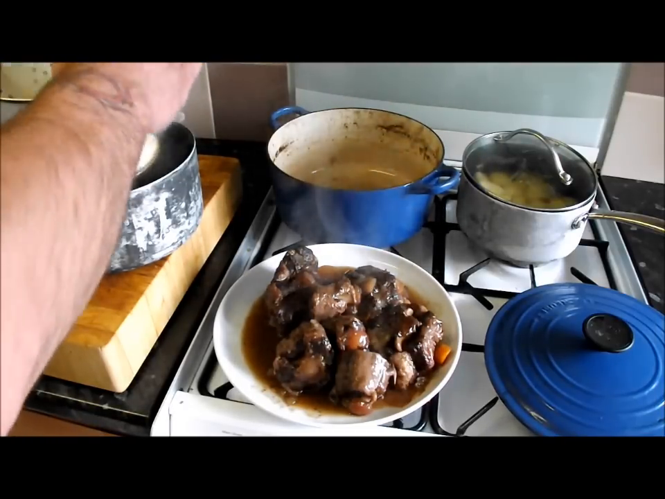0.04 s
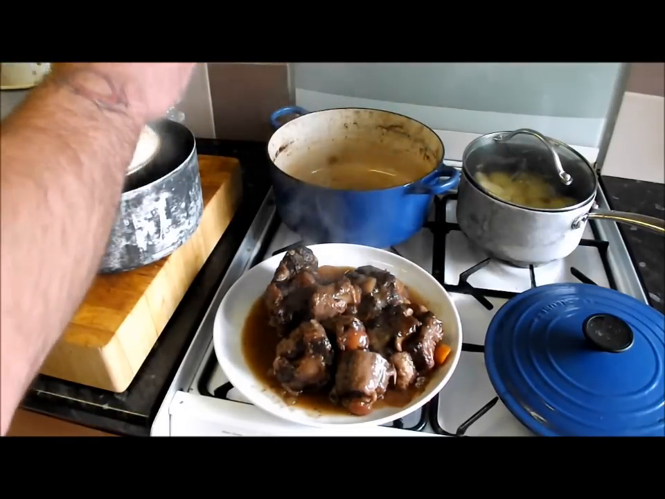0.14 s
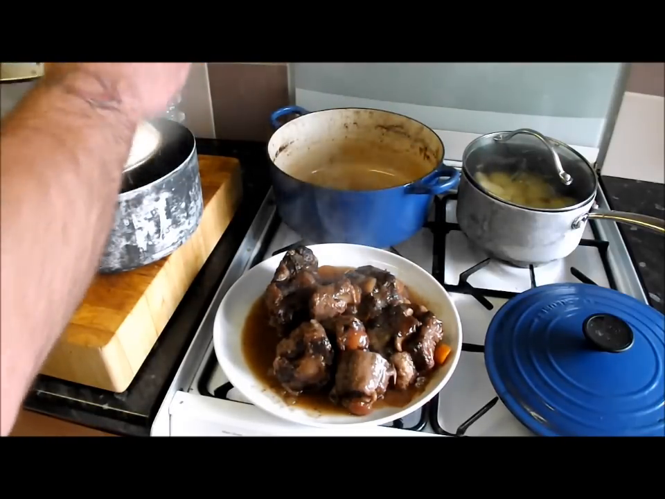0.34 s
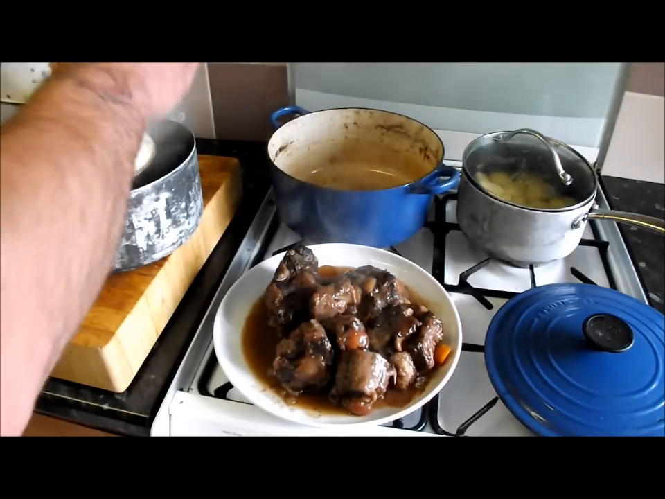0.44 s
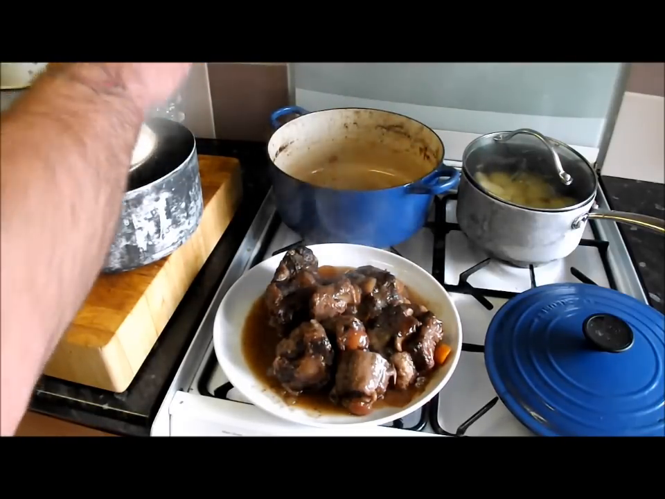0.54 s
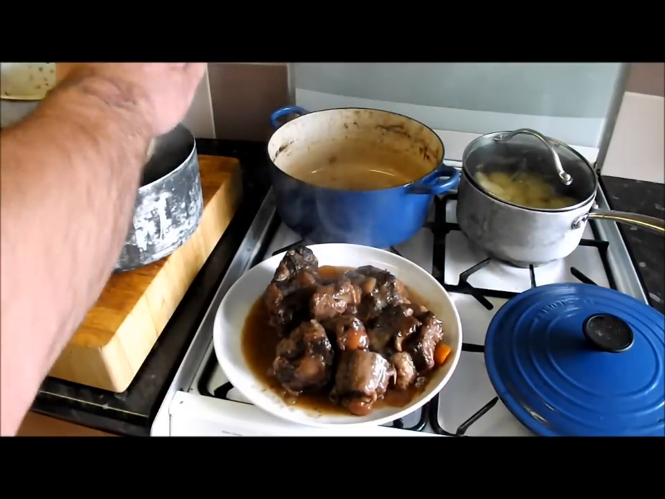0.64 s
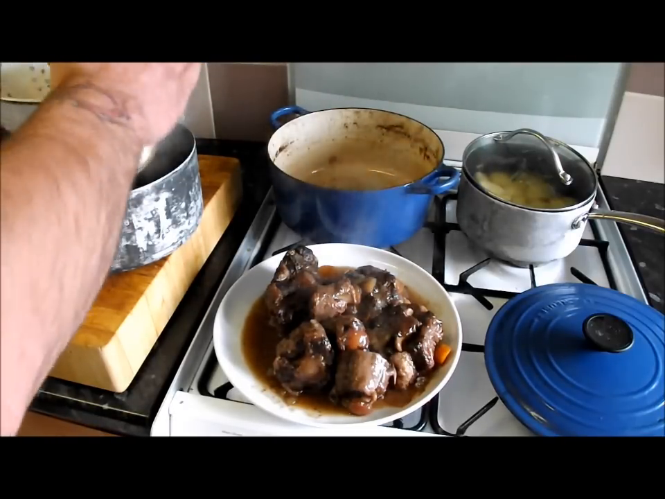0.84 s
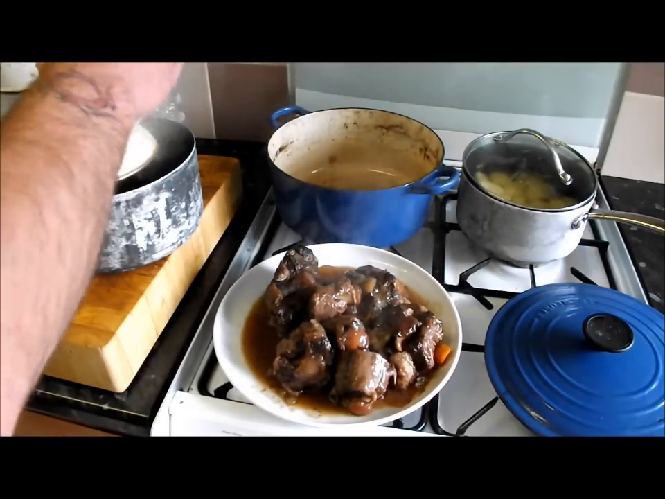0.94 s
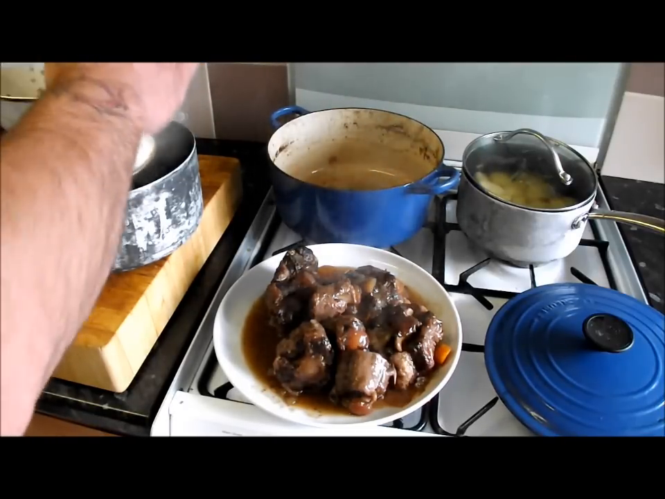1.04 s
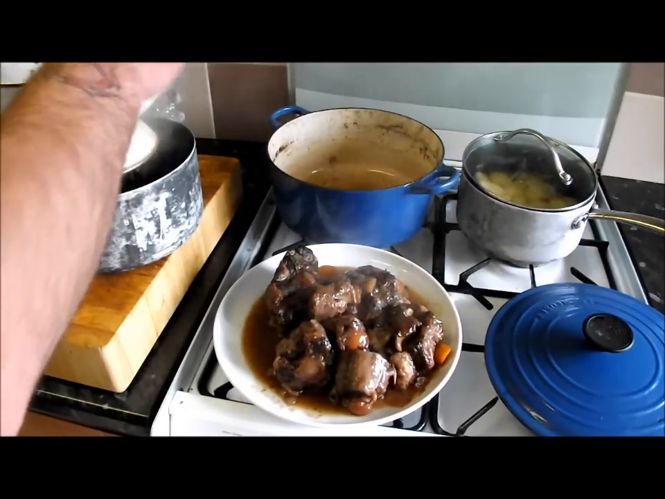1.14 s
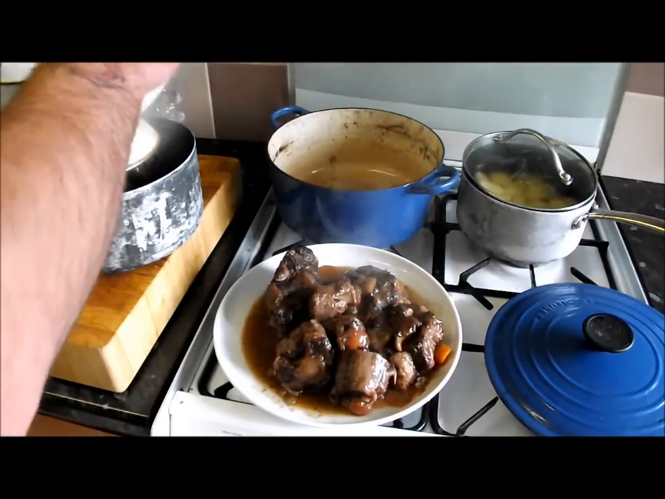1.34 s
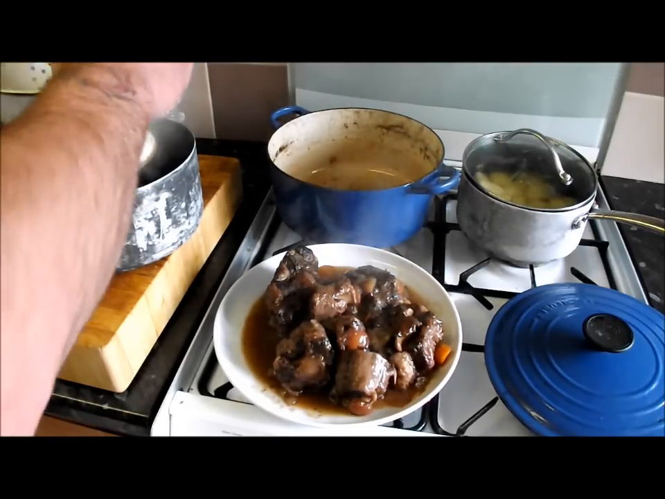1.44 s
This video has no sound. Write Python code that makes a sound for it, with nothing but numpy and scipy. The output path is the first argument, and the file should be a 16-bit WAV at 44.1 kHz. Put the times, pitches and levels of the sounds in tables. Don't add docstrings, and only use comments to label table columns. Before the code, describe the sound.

Sharp ringing clanks of steel colander against saucepan rim, uneven in force, with small rattles between

```python
import sys
import numpy as np
from scipy import signal
from scipy.fft import rfft, irfft, next_fast_len
from scipy.io import wavfile
from scipy.ndimage import map_coordinates

SR = 44100
rng = np.random.default_rng(int(sys.argv[2]) if len(sys.argv) > 2 else 0)


def transcribe(signal):
    frames = np.atleast_2d(signal).T
    limited = np.clip(frames, -1, 1)
    pcm = np.round(limited * 32767).astype(np.int16)
    wavfile.write(sys.argv[1], SR, pcm)


def volts_from_decibels(level):
    exponent = np.asarray(level, float) / 20
    return 10 ** exponent


N = 66150

# start in seconds, peak in dB, shell crash in dB, thud in dB, detuning in percent.
KNOCKS = [
    (.2134, -2.5, 0.5, -3, -1.76),
    (.4190, -14, 3, 5, 0.13),
    (.6229, -3.5, 2, 4, 0.44),
    (.8124, -6.5, -0.5, 11, 0),
    (1.2158, -11, 3.5, -10, 0.99),
]
# frequency in Hz, width in Hz, level in dB.
STRIKE_A = [(748, 235, -17), (1485, 64, -2.5), (1824, 70, -12), (2170, 59, -25), (2683, 58, -0.5),
            (3185, 117, -1.5), (3357, 126, -0.5), (4360, 120, -13), (5270, 114, -9), (6400, 71, -17),
            (7140, 155, -8), (7520, 115, -12), (8490, 250, -18.5)]
STRIKE_B = [(890, 200, -26), (1577, 59, -5), (2300, 260, -9.5), (2740, 49, 0.5), (2910, 70, -8),
            (3180, 120, -13), (3910, 90, -16), (4660, 68, -9.5), (5205, 85, -8), (5670, 120, -17),
            (6280, 130, -11), (6970, 150, -5), (10200, 390, -16)]
STRIKE_C = [(750, 180, -17.5), (954, 52, -13.5), (1410, 98, -13.5), (1570, 89, -11.5), (2264, 72, 3),
            (2720, 47, -1), (3080, 55, -3.5), (3158, 42, 3.5), (4505, 120, -10), (5350, 80, -13),
            (6020, 80, -19), (6750, 100, -3)]
STRIKE_D = [(760, 80, -16), (1000, 85, -13.5), (1600, 61, -6), (1770, 87, -2.5), (2140, 60, -14),
            (2642, 89, 5), (3270, 120, -10), (4435, 55, 2), (5240, 100, -7.5), (6260, 110, -13),
            (7130, 180, -9.5), (9800, 120, -15.5)]
STRIKE_E = [(730, 135, -20), (980, 165, -21), (1578, 98, -6), (1780, 89, -9.5), (2220, 61, -10),
            (2610, 125, -2.5), (2917, 120, -4.5), (3300, 140, -6), (4010, 44, -12.5), (4490, 120, -8),
            (5250, 100, -12.5), (5950, 80, -8), (6480, 99, -12), (6980, 196, -7)]
# first bounce in seconds, its level in dB,
# second bounce in seconds, its level in dB, contact brightness in Hz.
CHATTER = [
    (.0042, -4.5, .0082, -6.5, 32000),
    (0.0038, -10, 0.011, -4, 8700),
    (0.0034, -1, .0072, -6.5, 11200),
    (.0042, -1, .0097, -9, 13000),
    (.0045, -1, .0145, -1, 16400),
]
# frequency in Hz, decay time T60 in seconds.
PAN_MODES = [(830, 0.52), (1560, 0.41), (2735, 0.43), (3010, 0.47), (4510, 0.45)]
PAN_LEVELS = [(-40, -15.5, -7, -25, -46), (-35, -14, -17.5, -17, -30), (-45, -18.5, -19.5, -18, -31),
              (-36.5, -21, -15, -31, -31), (-43, -17, -38, -18, -30)]
# frequency in Hz, level in dB.
SHELL_SPECTRUM = [(300, -39), (700, -20.5), (1550, -13), (2100, -9), (2950, -2), (3800, -17.5), (7050, -13),
                  (16000, -32)]
# time in seconds, level in dB.
SCRAPE_LEVEL = [(0, -54), (0.051, -44), (0.064, -31.5), (.1, -37), (.15, -64), (.18, -50), (.3, -31.5),
                (.45, -22.5), (.6, -32.5), (.8, -35), (1.0, -44), (1.107, -41), (1.118, -36.5),
                (1.2, -41.5), (1.3, -20.5), (1.4, -36.5), (1.5, -35)]
# frequency in Hz, width in Hz, level in dB.
RIM_MODES = [(1518, 114, -3), (1990, 220, -5), (2754, 130, 4), (3250, 300, 2.5), (4200, 570, -7),
             (4820, 280, -7)]
# start in seconds, peak in dB, pitch in Hz, T60 in seconds, rise in seconds.
TOUCHES = [(0.047, -44, 1273, 0.063, 0.0022), (0.06, -48, 2720, 0.054, 0.0023),
           (0.0843, -23.5, 3210, 0.02, 0.00033), (0.0897, -23, 3300, 0.016, 0.0004),
           (0.101, -35, 3100, .06, .002), (0.109, -31.5, 3204, 0.037, 0.00086),
           (.114, -33, 3270, 0.053, 0.0018), (0.129, -32, 3200, .04, 0.0018),
           (0.163, -31.5, 3250, 0.12, 0.0064), (.176, -35, 3300, 0.066, .004),
           (.182, -31, 3350, 0.02, 0.00088), (0.189, -35.5, 2750, 0.11, 0.0039),
           (0.567, -24, 3060, 0.29, .008), (.556, -36.5, 4200, 0.52, 0.017),
           (.582, -26.5, 2963, 0.34, 0.011), (0.583, -35, 1200, 0.19, 0.012),
           (1.342, -24.5, 1298, 0.074, .003), (1.346, -24, 3230, .06, .002), (1.444, -45, 1870, 0.13, .004)]
# start in seconds, level in dB, T60 in seconds.
GLANCES = [
    (0.06, -51, 0.041),
    (1.1131, -34.5, 0.031),
    (1.347, -35.5, 0.044),
]
# frequency in Hz, level in dB.
GLANCE_SPECTRUM = [(700, -27), (1300, 2), (2000, -2), (3100, -4), (4500, -11.5), (8000, -23.5),
                   (15000, -28)]
# time in seconds, level in dB.
HAND_EFFORT = [(0, 0), (.15, -15), (.3, -1), (.45, 7.5), (.6, 4.5), (.7, -20), (1.0, -14), (1.12, -13.5),
               (1.3, 7), (1.432, 4), (1.5, -4.5)]
# frequency in Hz, level in dB.
HAND_SPECTRUM = [(60, -14), (105, 5.5), (170, -6), (260, 1), (500, -6), (900, -4.5), (3000, -78)]
# frequency in Hz, T60 in seconds.
ROOM_T60 = [(300, 0.51), (1500, 0.41), (3000, 0.37), (7000, 0.39), (14000, 0.3)]
# frequency in Hz, level in dB.
RUMBLE_SPECTRUM = [(8, -3), (20, 12.5), (35, -7.5), (60, -2), (120, -39)]
# frequency in Hz, level in dB.
AIR_SPECTRUM = [(41, 11.5), (70, -22), (140, -13), (800, -19), (1100, -23), (2720, -13.5), (9000, -35.5),
                (16000, -33)]


def unit(x):
    return x / np.sqrt(np.mean(x ** 2) + 1e-20)


def along(points, hz):
    f, v = np.transpose(points)
    return np.interp(np.log(hz + 1), np.log(f + 1), v)


def over_time(points):
    s, level_db = np.transpose(points)
    return np.interp(np.arange(N) / SR, s, level_db)


def wobble(rate):
    knots = rng.standard_normal(int(N * rate / SR) + 4)
    return map_coordinates(knots, [np.arange(N) * rate / SR])


def filtered(x, response):
    n = x.shape[-1]
    m = next_fast_len(n + SR // 2)
    return irfft(rfft(x, m) * response(np.fft.rfftfreq(m, 1 / SR)), m)[..., :n]


def resonances(peaks):
    def response(f):
        return sum((-1) ** k * volts_from_decibels(db) * 1j * f * w / (c * c - f * f + 1j * f * w)
                   for k, (c, w, db) in enumerate(peaks))
    return response


def coloured(spectrum, n):
    return unit(filtered(rng.standard_normal(n), lambda hz: volts_from_decibels(along(spectrum, hz))))


def knocks():
    earlier = (-0.18, -13.5, 0, 0, 0)
    blow_db = 4.5
    glance = 0.21
    lead = SR // 4
    out = np.zeros(N + lead + SR)
    rows = [*KNOCKS, earlier]
    strikes = [STRIKE_A, STRIKE_B, STRIKE_C, STRIKE_D, STRIKE_E, STRIKE_B]
    pan_levels = [*PAN_LEVELS, PAN_LEVELS[1]]
    chatters = [*CHATTER, CHATTER[1]]
    for (s, db, *touch), strike, pan_db, chatter in zip(rows, strikes, pan_levels, chatters):
        blow = knock(strike, pan_db, chatter, -glance * db, *touch)
        out[lead + round(s * SR):][:SR // 2] += volts_from_decibels(db + blow_db) * blow
    return out[lead:lead + N]


def knock(strike, pan_db, chatter, wet_db, crack_db, thud_db, detune):
    damped_hz = 50
    ring_db, room_db, crash_wet_db = 6, -3.5, 0
    contact_grit, contact_t60 = 0.25, 0.008
    shell_t60, shell_rise_s = 0.037, 0.00062
    thud_level_db, thud_hz, thud_t60 = -28.5, 255, 0.009
    t = np.arange(SR // 2) / SR
    first_s, first_db, second_s, second_db, bright_hz = chatter

    contact = contact_grit * rng.standard_normal(len(t)) * volts_from_decibels(-60 * t / contact_t60)
    hits = [0, round(first_s * SR), round(second_s * SR)]
    contact[hits] += 3 * volts_from_decibels(np.array([0, first_db, second_db]))
    modes = [(hz, max(width, damped_hz), db) for hz, width, db in strike]
    ring = filtered(contact, resonances(modes))
    ring = volts_from_decibels(ring_db) * ring / abs(ring).max()

    crash = volts_from_decibels(crack_db) * coloured(SHELL_SPECTRUM, len(t))
    crash = crash * volts_from_decibels(-60 * t / shell_t60) * (1 - np.exp(-t / shell_rise_s))
    ring, crash = filtered(np.array([ring, crash]), lambda hz: 1 / (1 + 1j * hz / bright_hz))

    thud = volts_from_decibels(thud_level_db + thud_db - 60 * t / thud_t60) * np.sin(2 * np.pi * thud_hz * t)
    room = volts_from_decibels(room_db + wet_db) * kitchen(ring + volts_from_decibels(crash_wet_db) * crash)
    return ring + crash + thud + pan_ring(pan_db, detune, t) + room


def pan_ring(levels_db, detune, t):
    split_pct, pair_db = 1.31, -1.5
    flutter_db, wander_rad = 2.5, 1
    out = np.zeros(len(t))
    for (mode_hz, t60), db in zip(PAN_MODES, levels_db):
        for k in (0, 1):
            hz = mode_hz * (1 + (detune - k * split_pct) / 100)
            level_db = db + k * pair_db + flutter_db * wobble(28.9)[:len(t)] - 60 * t / t60
            phase = 2 * np.pi * hz * t + wander_rad * wobble(38.9)[:len(t)]
            out += volts_from_decibels(level_db) * np.sin(phase)
    return out


def scrape():
    grains_per_s, grain_spread_db = 970, -3
    rasp_db, wet_db = -13, -2
    level_db = over_time(SCRAPE_LEVEL)
    happens = rng.random(N) < grains_per_s / SR
    size = volts_from_decibels(grain_spread_db * rng.exponential(1, N).clip(0, 3))
    slips = happens * size * rng.choice([-1, 1], N)
    rim = unit(filtered(slips * volts_from_decibels(1.0 * wobble(38.8)), resonances(RIM_MODES))) * volts_from_decibels(level_db)
    rasp = volts_from_decibels(rasp_db + level_db + 1.7 * wobble(57)) * coloured(SHELL_SPECTRUM, N)
    dry = rim + rasp
    return 0.44 * dry + 0.34 * volts_from_decibels(wet_db) * kitchen(dry)


def ticks():
    flutter_db, wander_rad = 4, 2.2
    out = np.zeros(N + SR)
    t = np.arange(SR // 4) / SR
    for s, db, hz, t60, rise_s in TOUCHES:
        phase = 2 * np.pi * hz * t + wander_rad * wobble(97)[:len(t)]
        note = volts_from_decibels(flutter_db * wobble(160)[:len(t)]) * np.sin(phase)
        grit = 0.14 * rng.standard_normal(len(t)) * volts_from_decibels(-60 * t / 0.0065)
        envelope = volts_from_decibels(db - 60 * t / t60) * (1 - np.exp(-t / rise_s))
        out[round(s * SR):][:len(t)] += envelope * (note + grit)
    return out[:N] + 0.32 * kitchen(out[:N])


def brushes():
    wet_db = 1.5
    out = np.zeros(N + SR)
    t = np.arange(SR // 4) / SR
    for s, db, t60 in GLANCES:
        out[round(s * SR):][:len(t)] += volts_from_decibels(db - 60 * t / t60) * coloured(GLANCE_SPECTRUM, len(t))
    return out[:N] + volts_from_decibels(wet_db) * kitchen(out[:N])


def handling():
    rub_db = -54
    level_db = rub_db + over_time(HAND_EFFORT) + 2.2 * wobble(24.8)
    return volts_from_decibels(level_db) * coloured(HAND_SPECTRUM, N)


def kitchen(x):
    delay_s = 0.005
    hz, t, z = signal.stft(rng.standard_normal(SR // 2), SR, nperseg=256)
    decay = volts_from_decibels(-60 * t / along(ROOM_T60, hz)[:, None])
    tail = signal.istft(z * decay, SR, nperseg=256)[1]
    tail = np.pad(tail, (round(delay_s * SR), 0))
    return signal.fftconvolve(x, tail / np.linalg.norm(tail))[:len(x)]


def room_tone():
    hum_hz, hum_db, octave_db, swing_db = 49.5, -41.5, -63, 2.5
    rumble_db, air_db = -39.5, -44
    turn = 2 * np.pi * np.cumsum(hum_hz + 0.46 * wobble(5.6)) / SR
    hum = volts_from_decibels(hum_db + swing_db * wobble(7.37)) * np.sin(turn)
    hum = hum + volts_from_decibels(octave_db + 1.1 * wobble(5.4)) * np.sin(2 * turn)
    rumble = coloured([(2, -30), *RUMBLE_SPECTRUM, (400, -80)], N)
    return np.sqrt(2) * hum + volts_from_decibels(rumble_db) * rumble + volts_from_decibels(air_db) * coloured(AIR_SPECTRUM, N)


def scene():
    mono = knocks() + scrape() + ticks() + brushes() + handling() + room_tone()
    return np.array([mono, mono])


def low_pass(x):
    return signal.sosfilt(signal.butter(12, 16810, fs=SR, output="sos"), x)


def record(dry):
    knee_db, slope, attack_s, release_s = -38.5, 0.4, 0.0085, 0.043
    mic_top_hz, cut_hz = 14800, 15900
    clip, clip_hardness = 0.51, 33
    mono_hz = 420
    lag_s = 1 / SR

    def smooth(x, s):
        return signal.lfilter([1 / (s * SR)], [1, 1 / (s * SR) - 1], x)

    def stereo(hz):
        half_turn = np.pi * hz * lag_s
        side = -1j * np.sin(half_turn) * hz ** 2 / (hz ** 2 + mono_hz ** 2)
        return (np.cos(half_turn) + np.outer([1, -1], side)) / (1 + (hz / cut_hz) ** 40)

    power = smooth(smooth(np.minimum(dry[0] ** 2, 1), release_s), attack_s)
    gain = (1 + power / volts_from_decibels(2 * knee_db)) ** (-slope / 2)
    x = filtered(dry, lambda hz: 1 / (1 + (hz / mic_top_hz) ** 20)) * gain
    x = x / (1 + abs(x / clip) ** clip_hardness) ** (1 / clip_hardness)
    mix = filtered(x, stereo)
    return low_pass(mix)


dry = scene()
out = record(dry)
transcribe(out)
```